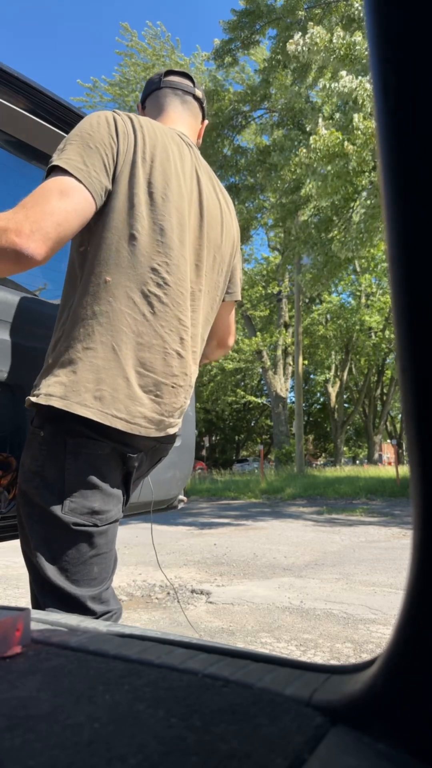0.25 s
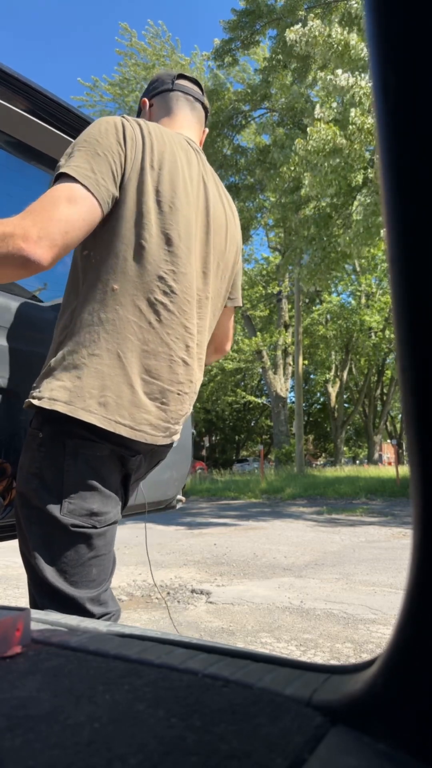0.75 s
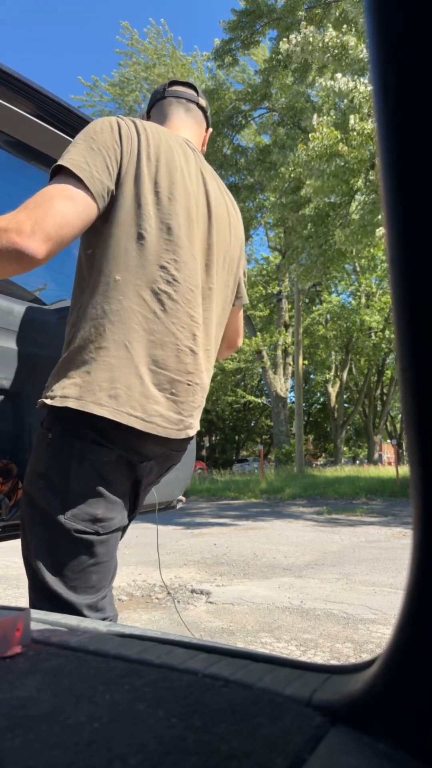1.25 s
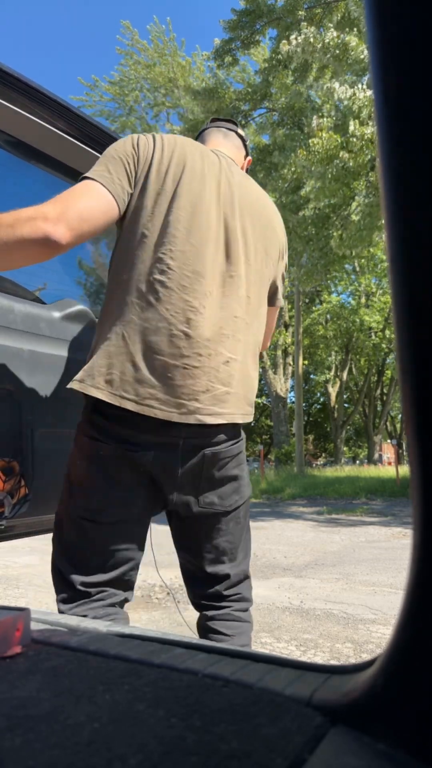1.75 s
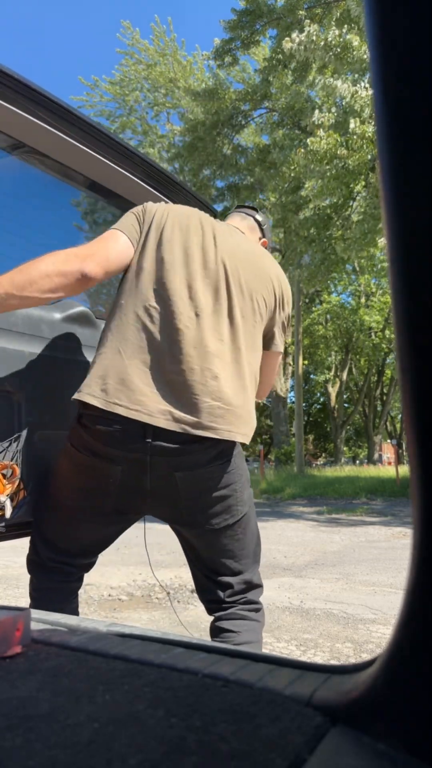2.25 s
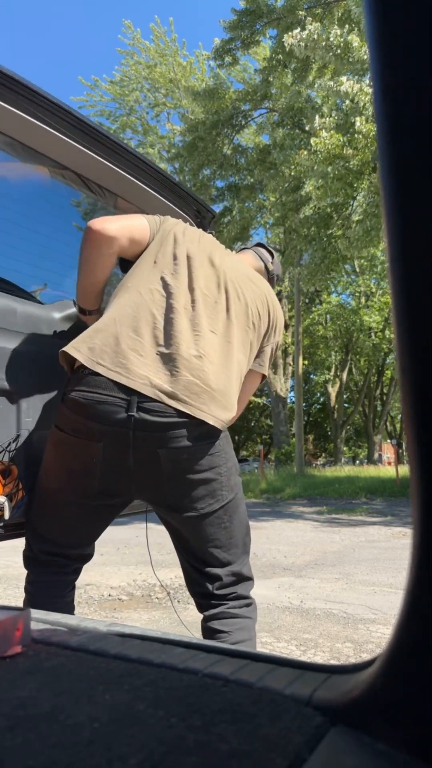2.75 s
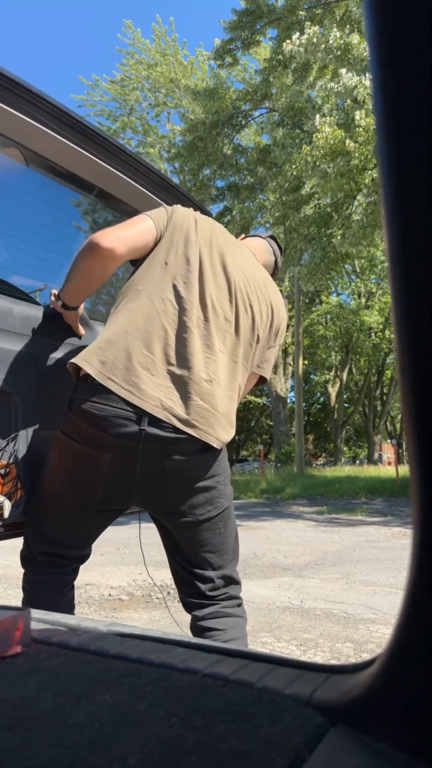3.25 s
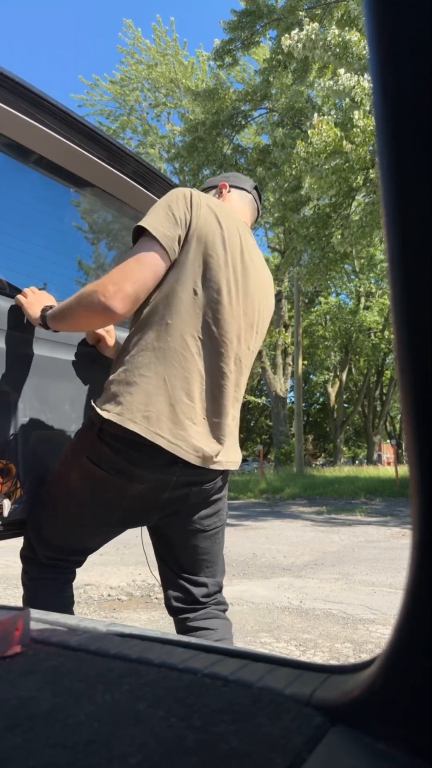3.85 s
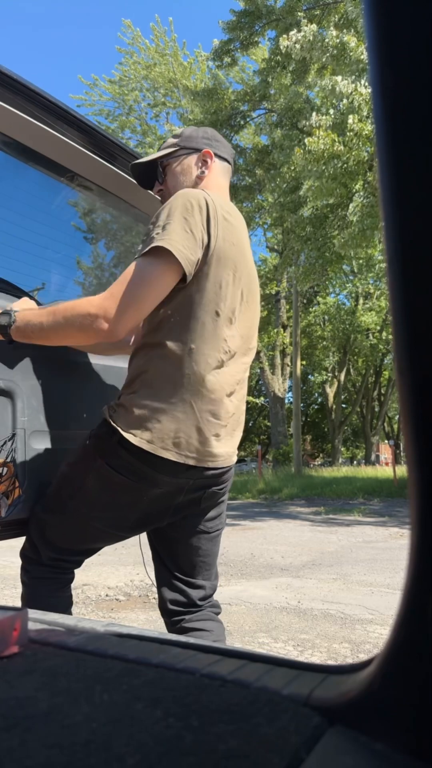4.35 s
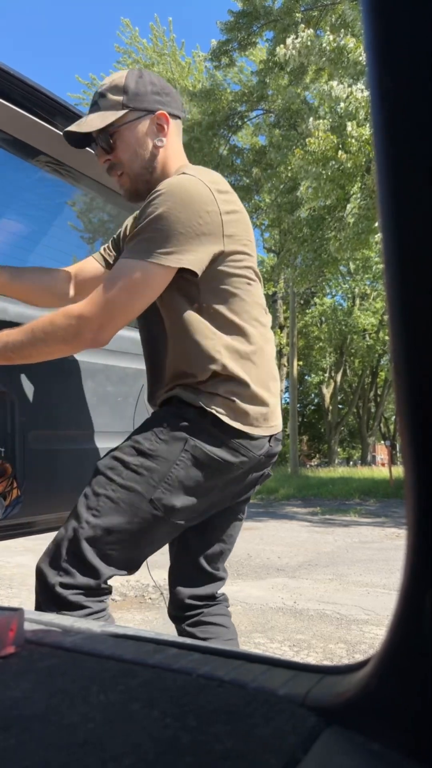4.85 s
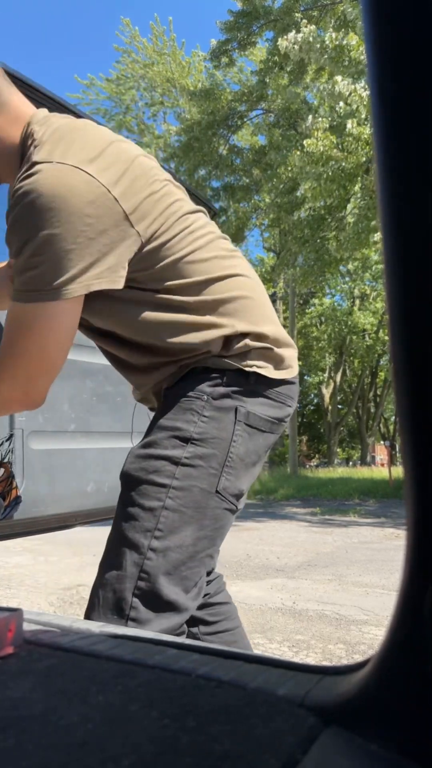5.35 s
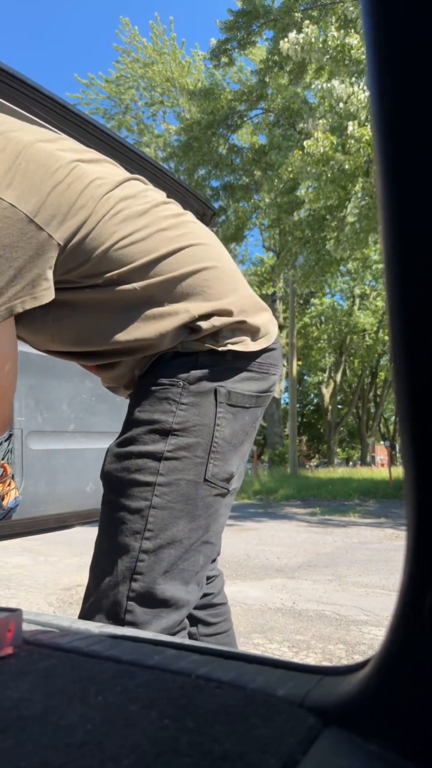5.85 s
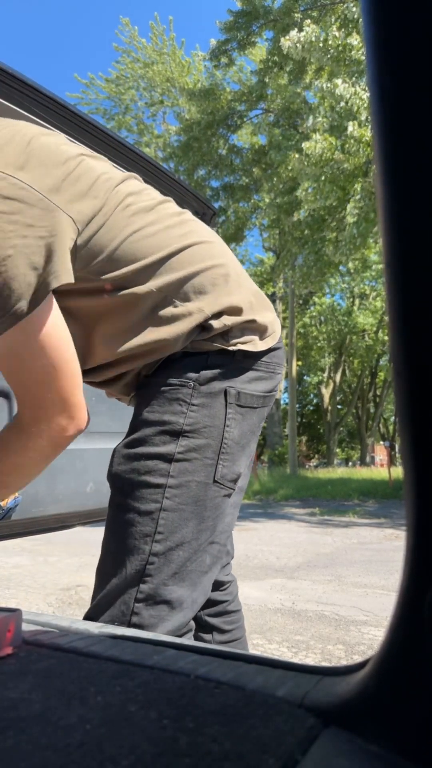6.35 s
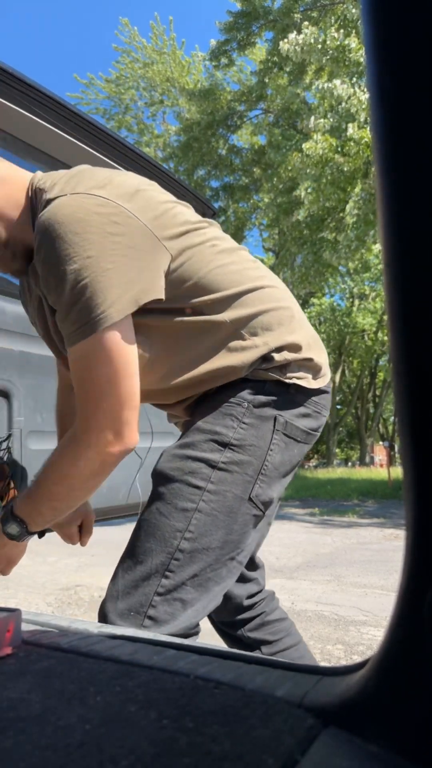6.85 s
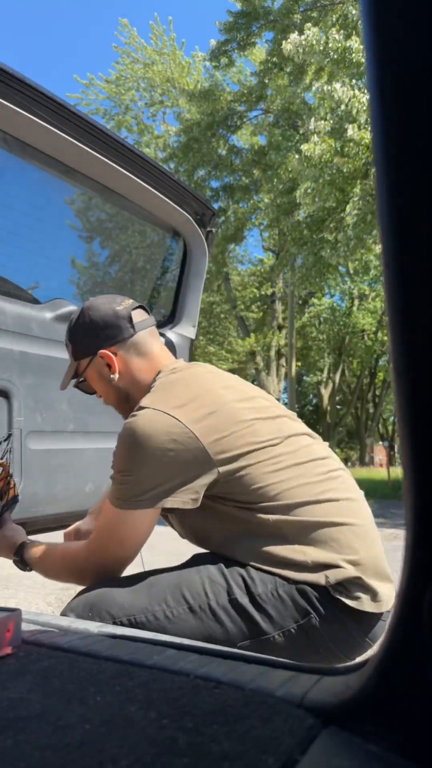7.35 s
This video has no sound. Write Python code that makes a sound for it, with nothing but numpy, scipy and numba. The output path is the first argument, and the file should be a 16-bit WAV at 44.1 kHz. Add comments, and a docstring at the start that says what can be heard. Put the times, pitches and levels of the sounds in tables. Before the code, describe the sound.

A plastic trim panel is clicked, tapped and then punched onto its clips on a van door, with hollow knocks and low booming thumps.

```python
"""A plastic trim panel is pressed and knocked onto its clips on an open van door, heard from a phone inside the van.
Each contact is a burst of dying rings, a hollow note, a tick and clattering noise with a short dull echo.
Fist blows also make the door boom a moment later, as low beating notes. Sliding hands and scuffing shoes are
flickering bands of noise, loose clips tick, and quiet outdoor air is shaped noise.
The phone's gain control holds down the loudest blows."""
import sys
import numpy as np
from scipy import signal
from scipy.fft import rfft, irfft
from scipy.io import wavfile
from scipy.ndimage import uniform_filter1d
from numba import njit

SR = 44100
rng = np.random.default_rng(int(sys.argv[2]) if len(sys.argv) > 2 else 0)


def master_out(mix):
    """Clip the mix to full scale and print it as 16-bit PCM to the path in sys.argv[1]."""
    frames = np.transpose(np.atleast_2d(mix))
    ceiling = np.clip(frames, -1, 1)
    pcm = np.round(ceiling * 32767).astype(np.int16)
    wavfile.write(sys.argv[1], SR, pcm)


N = 335601  # length in samples

# Levels, lengths and ring times here are starting values; the functions add trims and factors.
# Parts of a contact: body 0.2-0.9 kHz, knock 0.9-3 kHz, crack 3-7 kHz, snap above 7 kHz. t60 = time to fall 60 dB.

# single taps and clips snapping home: t/s, knock level/dB, body level/dB, crack level/dB, snap level/dB,
# hollow note f/Hz, tick f/Hz
TAPS = [(0.0347, -41, -38, -55, -66, 355, 2300), (.086, -34.5, -41, -41, -58, 343, 2350),
        (0.129, -47, -31.5, -49, -66, 530, 3540), (.166, -36, -47, -49, -61, 322, 2000),
        (0.2165, -35.5, -34.5, -56, -62, 557, 1800), (.2636, -50, -52, -42, -45, 604, 4570),
        (.2885, -24.5, -21.5, -30.5, -31, 671, 1830), (0.3203, -34.5, -43, -54, -55, 490, 2380),
        (0.3387, -47, -44, -34.5, -57, 263, 6100), (0.388, -35, -31, -61, -75, 342, 1330),
        (0.4325, -37.5, -54, -44.5, -57, 300, 2270), (0.4988, -32.5, -42, -39.5, -60, 477, 2220),
        (.5429, -33, -44, -39, -44, 470, 2370), (.6355, -47, -39.5, -53, -63, 333, 3080),
        (.7214, -41, -48, -49, -68, 577, 1510), (0.7555, -36.5, -33, -54, -59, 495, 1610),
        (.899, -26, -31.5, -46, -47, 880, 1730), (0.91, -30, -35.5, -52, -68, 456, 1950),
        (.9226, -35, -38.5, -54, -66, 233, 1810), (1.1339, -33, -33.5, -51, -65, 643, 1280),
        (1.1816, -41, -41, -60, -70, 530, 1440), (1.546, -68, -41.5, -57, -78, 232, 1690),
        (1.6558, -54, -39, -55, -73, 407, 2280), (1.8103, -39, -42, -42, -68, 330, 1330),
        (1.8754, -33.5, -24, -49, -59, 490, 2000), (1.8955, -35, -25, -54, -66, 310, 1670),
        (2.0671, -52, -26.5, -55, -66, 660, 1000), (2.0857, -44, -23, -33, -54, 295, 1000),
        (2.1311, -26.5, -20.5, -57, -59, 233, 1760), (2.15, -29, -21, -57, -59, 351, 1780),
        (2.215, -34, -44, -41, -55, 240, 2350), (2.2473, -34, -45, -45, -58, 328, 2380),
        (2.3798, -31.5, -47, -37.5, -47, 312, 3150), (2.5822, -22, -19.5, -29.5, -50, 348, 1830),
        (2.6245, -24, -11, -36, -32, 365, 1240), (2.782, -27, -25, -37.5, -64, 241, 2260),
        (2.8064, -19.5, -29, -27.5, -48, 312, 1420), (2.8217, -30, -26.5, -31.5, -22.5, 338, 1690),
        (2.8451, -21, -21, -28.5, -30, 883, 2240), (2.95, -30.5, -34, -62, -62, 815, 1790),
        (3.0572, -23, -29, -34, -35, 920, 2260), (3.0627, -31, -30, -59, -65, 364, 1020),
        (3.091, -41, -35.5, -46, -65, 380, 1410), (3.3863, -10.5, -16.5, -23, -42, 803, 1920),
        (3.4976, -35, -52, -41, -58, 910, 2300), (3.8535, -14, -13, -20.5, -15.5, 895, 5800),
        (4.0022, -36.5, -40, -42, -53, 500, 2300), (4.0102, -36, -39, -58, -64, 870, 1830),
        (4.0285, -25, -26, -29, -25, 537, 1630), (4.0502, -22.5, -18, -39, -56, 876, 1800),
        (4.112, -43, -31, -58, -72, 546, 1940), (4.165, -23, -16, -26, -18, 485, 1570),
        (4.5363, -33, -38.5, -50, -59, 810, 2020), (4.9557, -20, -17.5, -22, -17, 908, 6940),
        (5.0533, -40, -48, -45, -54, 228, 2680), (5.2574, -43.5, -45, -64, -75, 460, 2460),
        (5.5469, -42, -38.5, -55, -69, 502, 1000), (7.1045, -38.5, -40, -59, -69, 543, 2190),
        (7.1545, -64, -34, -67, -77, 434, 1130), (7.2762, -43.5, -47, -55, -76, 870, 1340),
        (7.4248, -48, -39, -48, -61, 255, 1960)]
# steady handling noise: t/s, rumble level/dB (below 0.2 kHz), creak level/dB (0.2-1.2 kHz),
# scrape level/dB (1.2-6 kHz), hiss level/dB (above)
HANDLING = [(0, -38, -38, -52, -62), (.45, -45.5, -42.5, -49, -61), (1.2, -40, -43.5, -49.5, -59),
            (1.4, -47, -49.5, -49.5, -63), (2.2, -40, -40, -49, -62), (2.28, -43, -44, -37, -42.5),
            (2.46, -43, -39, -34.5, -38.5), (2.52, -48, -44.5, -50.5, -59), (3.1, -34, -46, -51.5, -61),
            (3.17, -43, -44.5, -42.5, -44), (3.3, -49, -42, -42.5, -44.5), (3.37, -40, -45, -52, -52),
            (4.6, -46, -42.5, -54.5, -75), (5.3, -48, -55, -50.5, -73), (5.47, -43.5, -52.5, -64, -66),
            (5.75, -40, -54, -50, -53), (5.97, -37, -49.5, -51, -70), (6.5, -41, -52.5, -52.5, -84),
            (6.68, -56, -56.5, -62, -82), (6.88, -58, -51, -51, -49), (7.02, -48, -52, -45.5, -57),
            (7.2, -49, -50.5, -50, -60), (7.61, -45, -47.5, -59, -66)]
# short scrapes of panel, palm and shoe: t/s, length/s, knock level/dB, body level/dB, crack level/dB,
# snap level/dB, high resonance f/Hz
SCRAPES = [(0, 0.032, -41, -24, -55, -70, 2300), (.136, 0.094, -45, -32, -49, -68, 1810),
           (0.306, 0.08, -35, -30, -47, -72, 5830), (.719, 0.073, -43, -30.5, -47.5, -66, 900),
           (.895, 0.034, -32, -38, -50, -66, 1800), (1.047, 0.078, -46, -46, -53, -60, 950),
           (1.155, 0.11, -48, -39.5, -50, -65, 910), (1.847, 0.063, -34, -30.5, -47, -72, 900),
           (2.064, 0.071, -31, -18.5, -37, -69, 935), (2.122, 0.064, -35, -22, -58, -72, 900),
           (2.339, .06, -34.5, -35.5, -34, -62, 1920), (2.635, 0.059, -46, -32, -31, -36, 5150),
           (2.797, 0.032, -29, -20, -32, -56, 1430), (2.877, 0.095, -39.5, -30, -45.5, -49, 910),
           (2.969, 0.06, -54, -33.5, -47, -53, 880), (3.864, 0.067, -57, -38, -62, -58, 2350),
           (4.019, .055, -21, -27, -28, -48, 870), (4.291, 0.088, -48, -40, -56, -70, 2260),
           (4.517, 0.094, -36, -50, -43, -76, 1890), (5.204, 0.12, -46.5, -58, -53, -76, 2390),
           (5.336, 0.11, -62, -47.5, -57, -75, 900), (6.762, 0.28, -70, -51, -46.5, -59, 3950),
           (6.915, 0.12, -38, -42.5, -39, -55, 5000), (7.071, 0.041, -35, -38, -47, -63, 2150),
           (7.15, 0.034, -64, -41.5, -62, -70, 900), (7.422, 0.05, -67, -43, -62, -70, 900)]
# notes the panel can ring at: f/Hz, level/dB, t60/s
PANEL_MODES = [(274, -16.5, 0.079), (353.2, -5, 0.39), (457.5, 3.5, 0.13), (773, -4, 0.17), (823, -3, 0.13),
               (858, 0, 0.16), (967, -13.5, 0.26), (1070, -56, 0.18), (1329, -14, 0.22), (1440, -21, 0.095),
               (1574, -12, 0.051), (1783, -8.5, 0.08), (2086, -17, 0.084), (2110, -13.5, 0.073),
               (2120, -27.5, 0.11), (2450, -57, 0.087), (2490, -21.5, 0.16), (2662, -11, 0.047),
               (2800, -43, 0.14), (3052, -55, 0.19), (2950, -26.5, 0.14)]
# bands of clatter after a contact: f/Hz, width/Hz, level/dB, t60/s
CLATTER = [(278, 300, -7.5, 0.28), (596, 360, -4.5, 0.11), (1365, 970, -10.5, 0.14),
           (2300, 1130, -10.5, 0.087), (4000, 3100, -0.5, 0.095), (5360, 3400, -7.5, 0.042),
           (7950, 6100, -10, 0.06), (13700, 8400, -12, 0.042)]
# bands of the sliding noise: f/Hz, width/Hz, level/dB, grain level/dB
SLIDE_BANDS = [(62.4, 50, -1, -2), (106.5, 77, -5.5, -0.5), (240, 400, -1, 1.5), (544, 260, -11, 5),
               (820, 790, -9.5, 5.5), (1790, 1350, -8.5, 5.5), (3500, 2350, -10.5, 7), (4680, 3340, -11, 5),
               (7300, 4100, -9, -9.5), (13500, 12000, -9.5, 7)]
# colour of the outdoor air: f/Hz, level/dB (per Hz)
AIR_COLOUR = [(15, -37), (25, -33), (53, 10), (84, 6), (166, -6.5), (363, -32.5), (476, -18.5), (641, -28),
              (863, -11), (1100, -44.5), (1330, -25), (5000, -26.5), (16000, -61.5)]
# beating notes of the thin door skin: pitch ratio, level/dB, delay/s, t60/s
SKIN_MODES = [(0.99, -0.5, 0.00765, 0.16), (.8, -7.5, 0.01113, 0.34), (1.326, -3.5, 0.0061, 0.15)]
# beating notes of the heavy door frame: pitch ratio, level/dB, delay/s, t60/s
FRAME_MODES = [(1.021, 1.5, 0.0252, 0.38), (0.905, -6, 0.0335, 0.32), (1.206, 0.5, 0.0194, 0.21),
               (1, -23, 0.034, 0.14)]
# fist blows; the knuckles touch first, the panel rebounds after: t/s, knock level/dB, body level/dB,
# crack level/dB, hollow note f/Hz, tick f/Hz, lead of the touch t/s, touch knock level/dB, touch snap level/dB,
# rebound body level/dB, door skin level/dB, door skin f/Hz, door frame level/dB, chatter level/dB,
# rebound delay t/s, ring time factor
BLOWS = [(3.601, -7.5, -7, -15, 872, 1415, 0.0084, -25.5, -39, -9.5, -7.5, 163, -8.5, -25, 0.026, 0.9),
         (3.816, -9.5, -7.5, -17.5, 744, 1010, 0.0054, -22, -18, -18, -10, 149.6, -9.5, -31, 0.016, .73),
         (4.1325, -10.5, -0.5, -21, 486, 1420, 0.0034, -14, -6, -7, -5, 139, -6.5, -18, 0.018, 0.53),
         (4.3808, -15.5, -8, -21, 369, 983, 0.004, -17, -38, -15, -7.5, 129, -11.5, -24, 0.021, 0.82),
         (4.6403, -12, -14.5, -30, 545, 1740, 0.0045, -18, -14.5, -14, -8.5, 119.6, -13.5, -43, .0204, .7),
         (4.9384, -7, -10, -38, 544, 1730, 0.0045, -27, -20, -16, -4.5, 123.4, -13, -25, 0.015, 0.58),
         (5.635, -27.5, -15.5, -32, 558, 1790, 0.01, -30, -27, -36, -13.5, 130, -13.5, -21.5, .01, 0.81),
         (5.864, -11, -14.5, -19, 904, 1320, .0072, -23, -17, -24.5, -13, 120.7, -18.5, -21.5, .0198, 0.82),
         (6.1237, -7.5, -13.5, -17.5, 825, 3560, 0.0067, -22, -26, -31, -10, 135.2, -18, -22, .0144, 0.92),
         (6.374, -15.5, -15.5, -19, 798, 1990, .0055, -22, -26, -23.5, -9, 130, -16, -41, 0.015, 0.61),
         (7.5524, -31, -24.5, -50, 330, 1250, 0.0072, -21.5, -24.5, -24, -4.5, 126, -10, -31, .0094, 0.98)]
# palm pushes felt by the door: t/s, skin level/dB, frame level/dB
PUSHES = [(0, -21.5, -37), (0.289, -19.5, -33), (0.744, -25.5, -32), (.9, -19, -46), (1.131, -24.5, -37),
          (1.876, -16, -30), (2.07, -16.5, -33), (2.134, -14, -23.5), (2.588, -15, -28),
          (2.624, -14.5, -39), (2.785, -10.5, -27), (2.845, -20, -24.5), (2.98, -36, -27),
          (3.062, -23.5, -28.5), (3.384, -21, -22.5), (3.855, -9, -23), (4.03, -26.5, -23),
          (4.471, -40, -22), (4.55, -35, -22.5), (4.778, -42, -22.5), (6.17, -21, -21.5),
          (6.489, -35, -29.5), (7.152, -34, -37), (7.43, -27.5, -37)]
# faint ticks of a loose clip: t/s, knock level/dB
TICKS = [(3.4442, -44), (3.7182, -46), (3.9695, -45), (4.2538, -47), (4.2828, -54), (4.3024, -44),
         (4.3284, -41), (4.3504, -41), (4.5023, -45), (4.5884, -45), (4.817, -43.5), (4.8673, -46.5),
         (4.8834, -48), (5.0939, -46.5), (5.1197, -46), (5.2272, -48), (5.3525, -43.5), (5.4064, -46.5),
         (5.5818, -44.5), (5.8155, -47), (5.9819, -62), (6.0264, -51), (6.0666, -48), (6.5236, -51.5),
         (6.62, -52), (7.1772, -46)]

AIR_DB, AIR_SWELL_DB = -47, 3
CABIN_T60_S, CABIN_DB = 0.17, -22
TAP_RING = 0.82  # ring time factor, as are the other _RING settings
BLOW_SNAP_DB = -19  # snap against the crack
TOUCH_BODY_DB, TOUCH_CRACK_DB = 4.5, -4  # against the touch knock
TOUCH_TICK_HZ, TOUCH_RING = 1874, 0.64
REBOUND_KNOCK_DB, REBOUND_CRACK_DB, REBOUND_SNAP_DB = -12.5, -34, -40  # against the rebound body
REBOUND_TICK_HZ, REBOUND_RING = 1190, 0.67
REBOUND_PITCH = 0.7  # the released panel sounds lower
# the panel chatters in its seat after a blow; knock, body, crack, snap against the chatter level
CHATTER_S, CHATTER_LENGTH_S, CHATTER_DB = 0.009, 0.035, (-7, -1, -13, -31)
SCRAPE_LOW_HZ, CHATTER_HIGH_HZ = 340, 900
PUSH_SKIN_HZ, FRAME_HZ, DOOR_RING = 142.4, 63.1, 0.81
# low noise after a blow or push; level against the frame
SHUDDER_DB, SHUDDER_T60_S, SHUDDER_RISE_S = -12, 0.74, 0.06
TICK_BODY_DB, TICK_CRACK_DB, TICK_SNAP_DB = -9.5, -9.5, -19  # against the knock
TICK_HOLLOW_HZ = 410
RATTLE_PER_S, RATTLE_HZ, RATTLE_DB = 19, 2290, -3  # level against the handling scrape
TOP_HZ = 16300  # upper limit of the phone's sound


def undb(db):
    """Turns decibels into a plain amplitude."""
    return 10 ** (np.asarray(db) / 20)


def unit(x):
    """Scales a sound to an rms (average strength) of 1."""
    return x / np.sqrt(np.mean(x ** 2))


def band(hz, width):
    """Fresh noise through a resonance applied twice, rms 1."""
    b, a = signal.iirpeak(hz, hz / width, fs=SR)
    once = signal.lfilter(b, a, rng.standard_normal(N))
    return unit(signal.lfilter(b, a, once))


def walk(rate):
    """Random wandering levels: about `rate` new values per second, joined by slopes."""
    hold = int(SR / rate) + 1
    steps = np.repeat(rng.standard_normal(N // hold + 1), hold)
    return uniform_filter1d(steps, hold)[:N]


@njit
def add(out, start, hz, gain, t60, rise, turn):
    """Adds dying rings that swell over the rise time; pitch 0 with a quarter turn gives a plain decay."""
    for m in range(len(hz)):
        step = np.exp(2j * np.pi * hz[m] / SR - np.log(1000) / (t60[m] * SR))
        z, lag, lag_step = gain[m] * np.exp(1j * turn[m]), 1., np.exp(-1 / (rise[m] * SR))
        for i in range(start[m], min(len(out), start[m] + int(t60[m] * SR))):
            z, lag = z * step, lag * lag_step
            out[i] += z.imag * (1 - lag)


@njit
def follow(x, attack, release):
    """Level follower, quick up and slow down."""
    level, e = np.empty(len(x)), 0.
    for i in range(len(x)):
        e += (abs(x[i]) - e) * (attack if abs(x[i]) > e else release)
        level[i] = e
    return level


def rings(s, hz, db, t60, rise, turn):
    """Sum of many rings; all columns are stretched to the same shape."""
    out = np.zeros(N)
    columns = np.broadcast_arrays(s, hz, db, t60, rise, turn)
    s, hz, db, t60, rise, turn = (np.ravel(c) * 1. for c in columns)
    start = (s * SR).astype(np.int64)
    add(out, start, hz, undb(db), np.clip(t60, .005, 2), np.clip(rise, 1e-4, .1), turn)
    return out


def air():
    """Distant outdoor rumble and leaves: noise coloured by pitch, swelling slowly."""
    hz = np.maximum(np.fft.rfftfreq(N, 1 / SR), 1)
    table_hz, table_db = np.transpose(AIR_COLOUR)
    colour = undb(np.interp(np.log(hz), np.log(table_hz), table_db))
    noise = irfft(rfft(rng.standard_normal(N)) * colour, N)
    return unit(noise) * undb(AIR_DB + AIR_SWELL_DB * walk(1.69))


def strokes():
    """Power curves (knock, body, crack, snap) of short scrapes and chatter, and the resonances they sing in."""
    power, sung = np.zeros((4, N)), np.zeros(N)
    events = [(*row, SCRAPE_LOW_HZ) for row in SCRAPES]
    events += [(b[0] + CHATTER_S, CHATTER_LENGTH_S, *(b[13] + np.array(CHATTER_DB)), CHATTER_HIGH_HZ, b[4])
               for b in BLOWS]
    for s, length, *db, high_hz, low_hz in events:
        a = int(max(s, 0) * SR)
        n = min(int(1.35 * length * SR), N - a)
        shape = np.sin(np.pi * np.linspace(0, 1, n) ** 0.64) ** 2.06  # quick start, slow release
        power[:, a:a + n] += np.outer(undb(db) ** 2, shape)
        high_db = db[0 if high_hz < 3000 else 2] - 6.0  # follows the knock or the crack
        low_db = db[1] - 11.0
        for hz, peak_db in ((high_hz, high_db), (low_hz, low_db)):
            noise = rng.standard_normal(int(.4 * SR))
            ring = signal.lfilter(*signal.iirpeak(hz, 9.0, fs=SR), noise)[-n:]
            sung[a:a + n] += unit(ring) * np.sqrt(shape) * undb(peak_db)
    return power, sung


def sliding():
    """Friction noise: all of it shares a stick-slip grain, and each band flickers on its own."""
    s, *columns = np.transpose(HANDLING)
    t = np.arange(N) / SR
    rumble, creak, scrape, hiss = (undb(np.interp(t, s, c)) ** 2 for c in columns)
    hit, _, _, frame_db = booms()
    shudder = rings(hit, 0, frame_db + SHUDDER_DB, SHUDDER_T60_S, SHUDDER_RISE_S, np.pi / 2)
    slow = np.array([rumble + shudder ** 2, creak, scrape, hiss])
    slow = np.repeat(slow, [2, 3, 3, 2], axis=0)  # one power curve for each band
    (knock, body, crack, snap), sung = strokes()
    brief = [0, 0, body, body, knock, knock, crack, crack, snap, snap]
    grain = walk(150)
    out = sung * undb(1.2 * grain)
    for (hz, width, db, grain_db), steady, burst in zip(SLIDE_BANDS, slow, brief):
        power = steady * undb(1.0 * grain) + burst * undb(2 * grain_db * grain)
        flicker_db = 2.22 * walk(25)
        out = out + band(hz, width) * np.sqrt(power) * undb(db + flicker_db)
    return out


def booms():
    """Columns (t/s, skin level/dB, skin f/Hz, frame level/dB) of all that shakes the door."""
    rows = [(b[0], *b[10:13]) for b in BLOWS]
    rows += [(s, skin, PUSH_SKIN_HZ, frame) for s, skin, frame in PUSHES]
    return np.transpose(rows)[:, :, None]


def door():
    """The door skin answers first, the heavy frame later, each with a few beating notes."""
    s, skin_db, skin_hz, frame_db = booms()
    out = 0
    for modes, push_db, hz in ((SKIN_MODES, skin_db, skin_hz), (FRAME_MODES, frame_db, FRAME_HZ)):
        ratio, db, delay, t60 = np.transpose(modes)
        turn = 1.64 * rng.standard_normal((len(s), len(modes)))
        out = out + rings(s + delay, hz * ratio, push_db + db + 2.0, t60 * DOOR_RING, 0.0092, turn)
    return out


def contacts():
    """Rows (t, knock, body, crack, snap, ring, hollow Hz, tick Hz): three a blow, one a tap or tick."""
    rows = [(s, knock, body, crack, snap, TAP_RING, hollow, tick)
            for s, knock, body, crack, snap, hollow, tick in TAPS]
    rows += [(s, knock, knock + TICK_BODY_DB, knock + TICK_CRACK_DB, knock + TICK_SNAP_DB,
              TAP_RING, TICK_HOLLOW_HZ, RATTLE_HZ) for s, knock in TICKS]
    for s, knock, body, crack, hollow, tick, lead, touch, snap, back, *_, late, ring in BLOWS:
        rows += [(s - lead, touch, touch + TOUCH_BODY_DB, touch + TOUCH_CRACK_DB, snap,
                  TOUCH_RING, hollow, TOUCH_TICK_HZ),
                 (s, knock, body, crack, crack + BLOW_SNAP_DB, ring, hollow, tick),
                 (s + late, back + REBOUND_KNOCK_DB, back, back + REBOUND_CRACK_DB, back + REBOUND_SNAP_DB,
                  REBOUND_RING, hollow * REBOUND_PITCH, REBOUND_TICK_HZ)]
    return np.array(rows)


def plate(s, knock_db, crack_db):
    """First instants of a contact: random short upper notes give each crack its edge and colour."""
    hz = 1000 * 7 ** rng.uniform(size=(len(s), 8))  # eight notes, 1-7 kHz
    db = np.where(hz < 3000, knock_db - 10.5, crack_db - 8.5) + 2.5 * rng.standard_normal(hz.shape)
    return rings(s, hz, db, 0.035 * (2000 / hz) ** 0.44, 1e-4, 0)


def panel():
    """Every contact rings the panel's notes in a new mix and sets off a clatter whose treble dies sooner."""
    s, knock, body, crack, snap, ring, hollow_hz, tick_hz = contacts().T[:, :, None]
    hz, db, t60 = np.transpose(PANEL_MODES)
    chance = rng.standard_normal((len(s), 3, len(PANEL_MODES)))
    # the place struck decides which notes speak; a held panel is detuned a little
    tone_db = np.where(hz < 900, body - 4.0, knock + 3.54) + db + 4.76 * chance[:, 0]
    tone_hz = hz * (1 + 0.03 * chance[:, 1])
    # low notes swell more slowly
    out = rings(s, tone_hz, tone_db, 0.59 * t60 * ring, 1.06 / hz, 3 * chance[:, 2])
    # the stretch of panel under the hand gives a hollow note
    out += rings(s, hollow_hz, body + 5.0, 0.1 * ring * (400 / hollow_hz) ** 0.99, 0.56 / hollow_hz, 0)
    # it lingers, beating
    pair_hz = hollow_hz * np.array([.985, 1.02])
    out += rings(s, pair_hz, body - 9.0, 0.2 * ring, 3.8 / hollow_hz, 0)
    tick_db = np.where(tick_hz < 3000, knock, crack) + 5.9
    out += rings(s, tick_hz, tick_db, 0.027 * ring, 0.78 / tick_hz, 0)
    clatter = np.zeros(N)
    forces = np.repeat([body, knock, crack, snap], 2, axis=0)  # two bands each
    for (hz, width, db, t60), force in zip(CLATTER, forces):
        # bands far in pitch from the hollow note and the tick are weaker
        octaves = np.minimum(np.abs(np.log2(hz / hollow_hz)), np.abs(np.log2(hz / tick_hz)))
        level = force + db - 3.0 * octaves.clip(0, 1.5)
        sharp = rings(s, 0, level + 6.0, 0.23 * t60 * ring, 0.28 / hz, np.pi / 2)
        tail = rings(s, 0, level + 1.0, t60 * ring, 0.0011 + 2.4 / hz, np.pi / 2)
        clatter += (sharp + tail) * band(hz, width) * undb(3.7 * walk(250))
    return out + clatter + plate(s, knock, crack)


def cabin(x):
    """Short dull reverberation of the carpeted van: the sound is smeared by dying noise."""
    t = np.arange(int(.4 * SR)) / SR
    dull = signal.lfilter([1], [1, -.6], rng.standard_normal(len(t)))
    tail = dull * np.exp(-np.log(1000) * t / CABIN_T60_S) * (t > .004)
    tail = tail / np.sqrt(np.sum(tail ** 2))
    return x + undb(CABIN_DB) * signal.fftconvolve(x, tail)[:N]


def rattle():
    """Loose clips tick faintly at random moments, louder where the handling scrapes more."""
    s = np.cumsum(-np.log(rng.uniform(size=400)) / RATTLE_PER_S)
    chance = rng.standard_normal((400, 2))
    handling_s, _, _, scrape_db, _ = np.transpose(HANDLING)
    db = np.interp(s, handling_s, scrape_db) + RATTLE_DB + 5.3 * chance[:, 0]
    return rings(s, RATTLE_HZ * np.exp(0.186 * chance[:, 1]), db, 0.027, .0002, 0)


def scene():
    """All layers together; only the panel gets the van's reverberation."""
    return (air() + sliding() + door() + cabin(panel()) + rattle())[None]


def record(dry):
    """The phone: gain control holds loud blows down, peaks are rounded, the top is cut."""
    level = follow(dry[0], 0.047, 1 / (.08 * SR))
    held = dry * np.minimum(1, (0.54 / (level + 1e-9)) ** .5)  # halves the dB above 0.54
    rounded = np.tanh(1.008 * held) / 1.06
    return signal.sosfilt(signal.ellip(8, .2, 70, TOP_HZ, fs=SR, output="sos"), rounded)


dry = scene()
out = record(dry)
master_out(out)
```